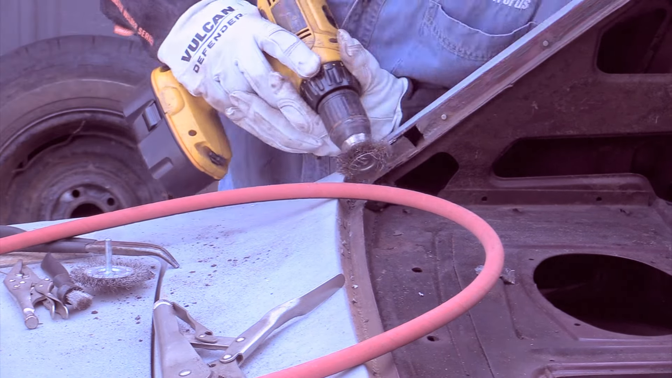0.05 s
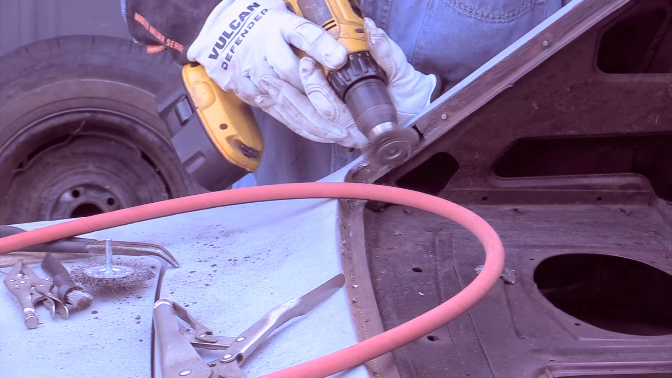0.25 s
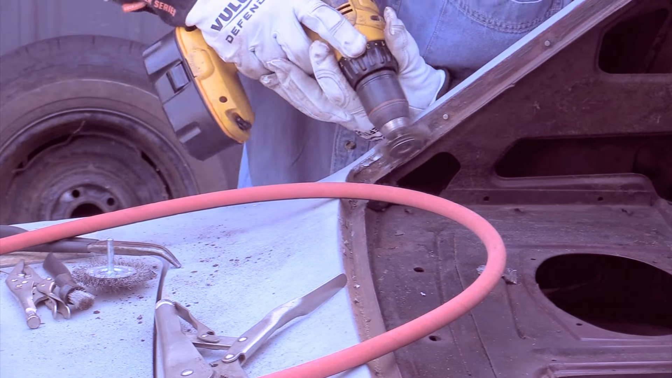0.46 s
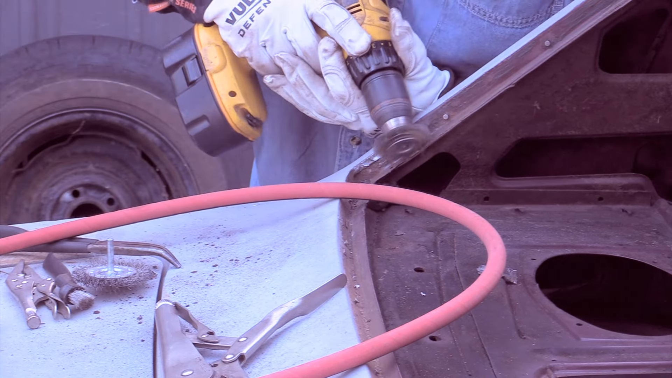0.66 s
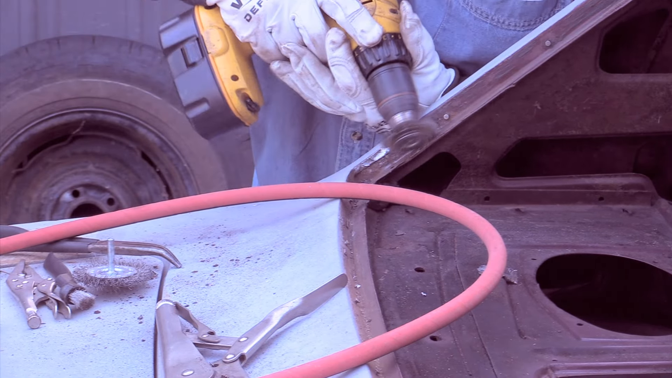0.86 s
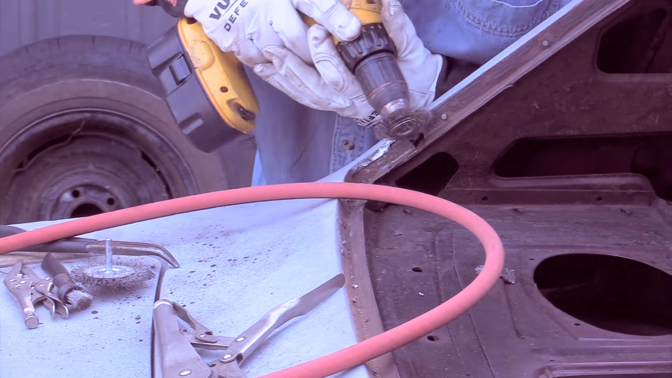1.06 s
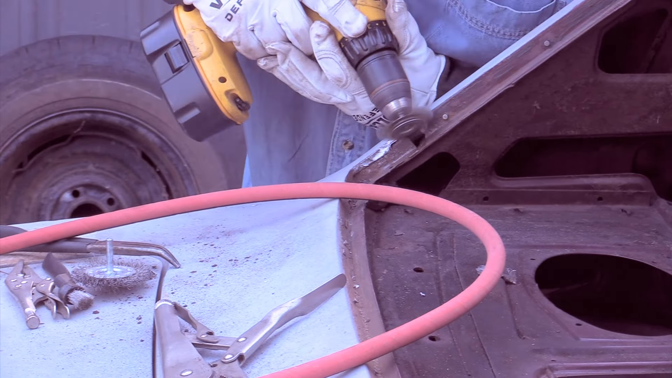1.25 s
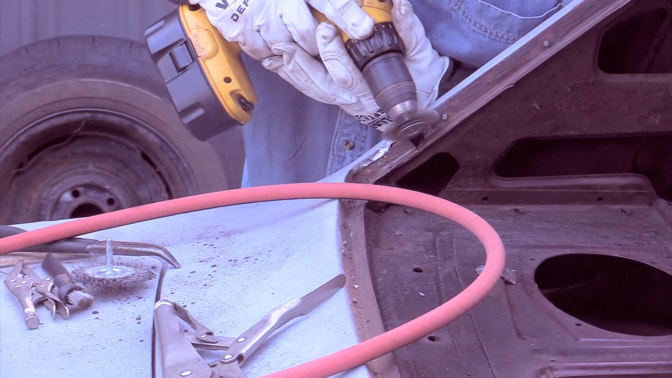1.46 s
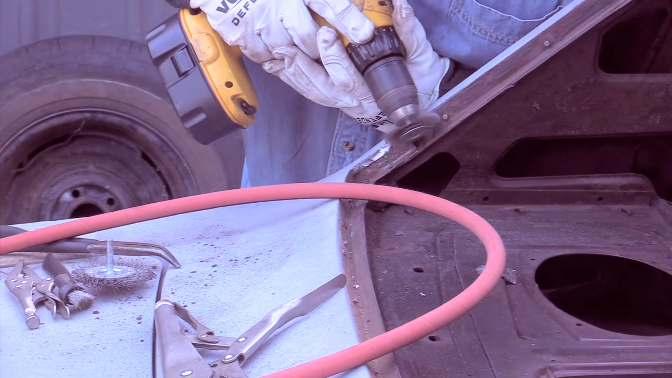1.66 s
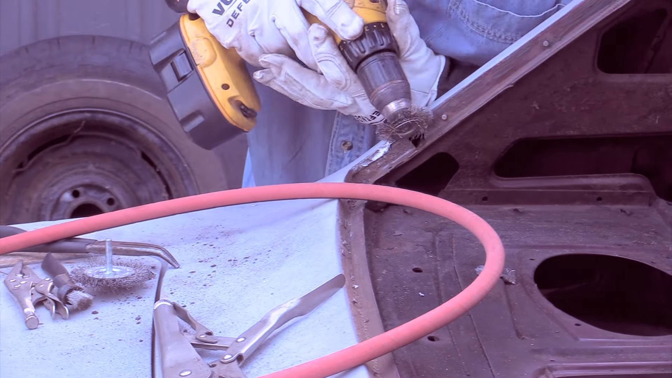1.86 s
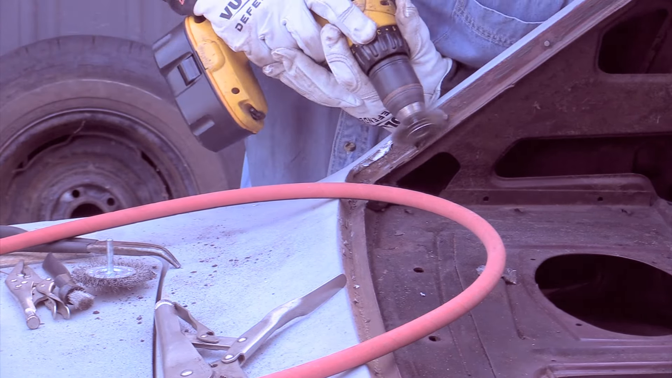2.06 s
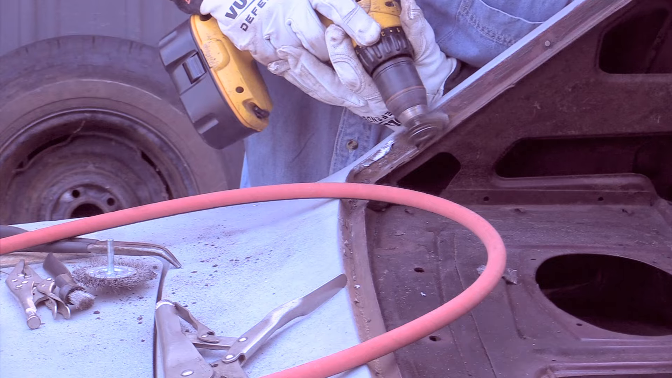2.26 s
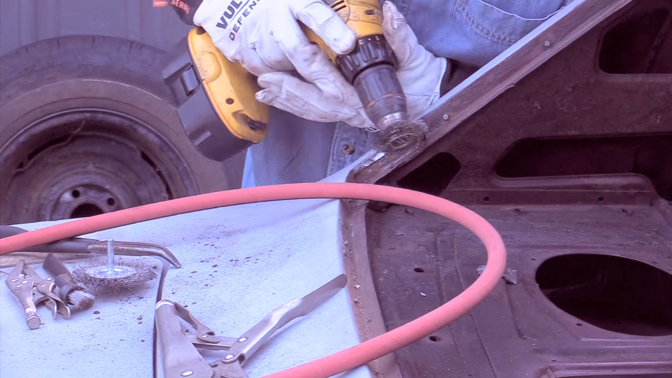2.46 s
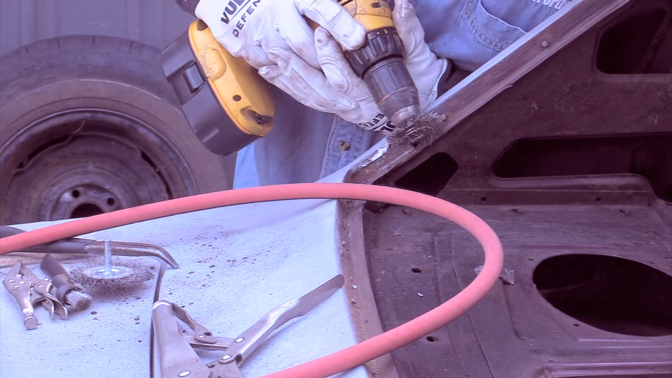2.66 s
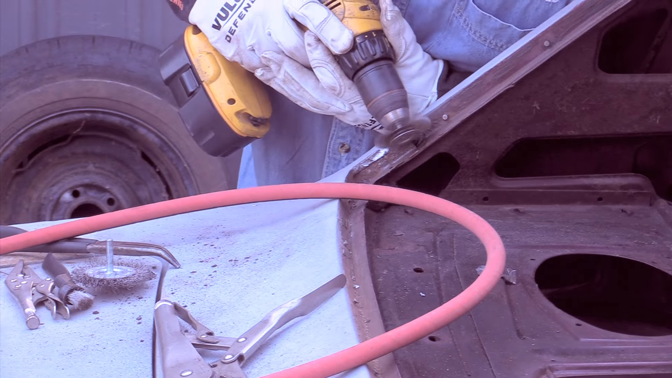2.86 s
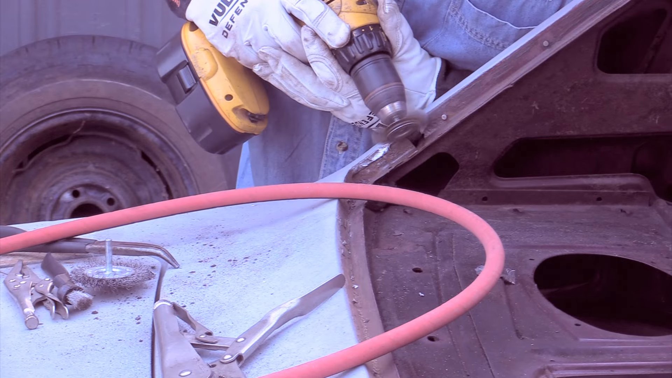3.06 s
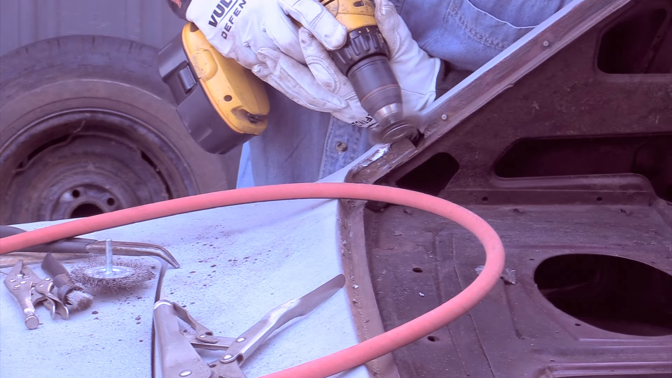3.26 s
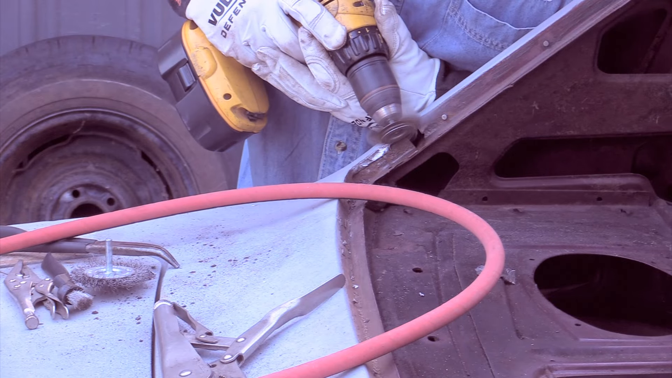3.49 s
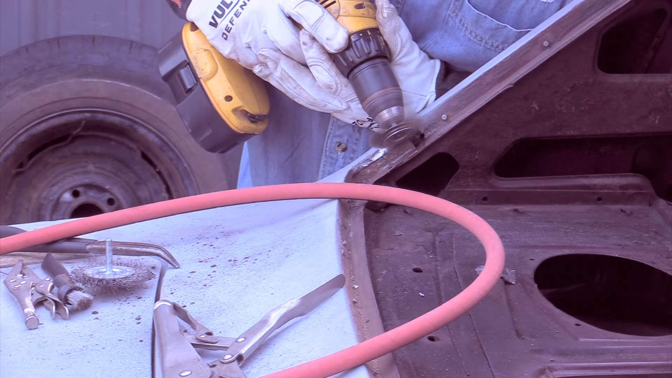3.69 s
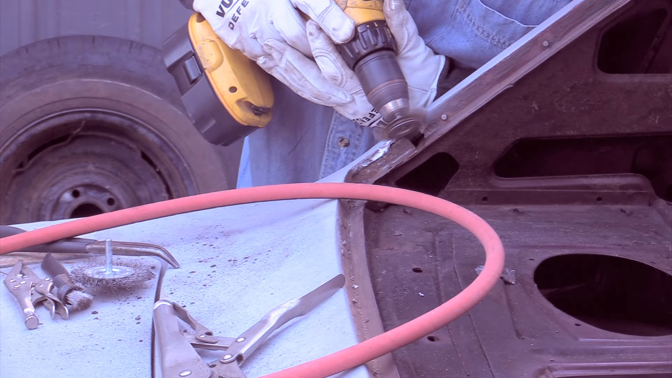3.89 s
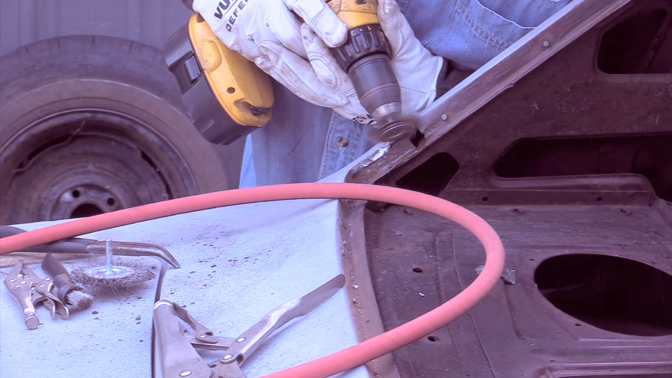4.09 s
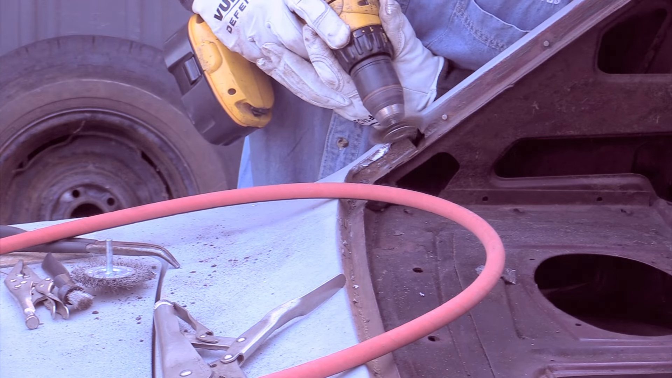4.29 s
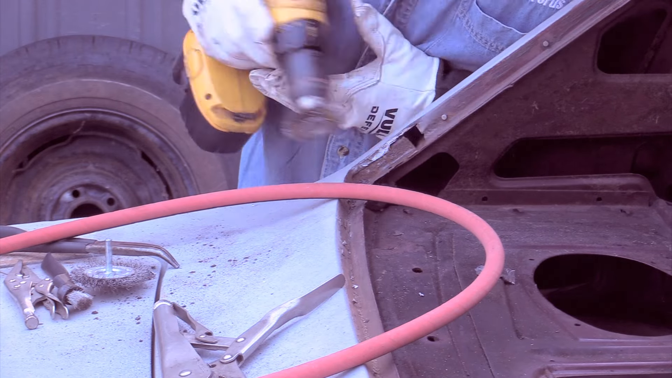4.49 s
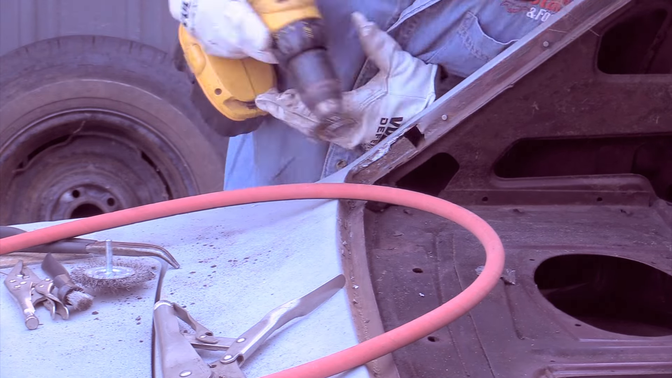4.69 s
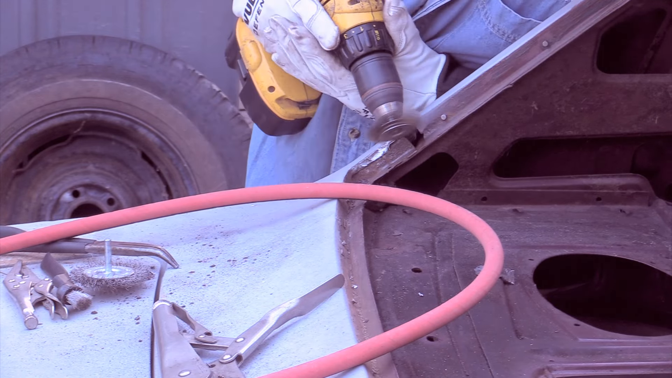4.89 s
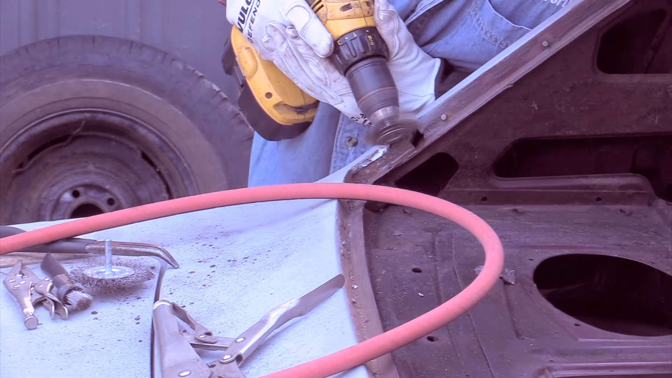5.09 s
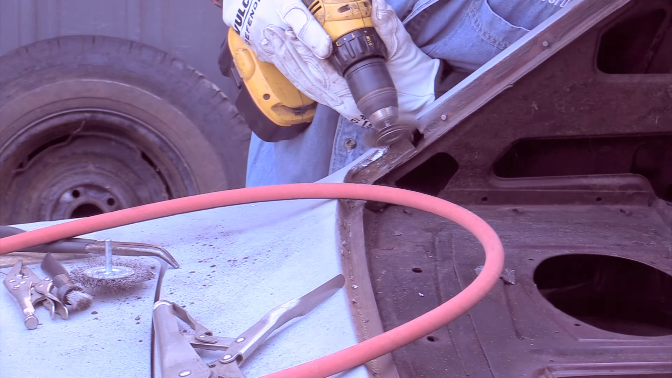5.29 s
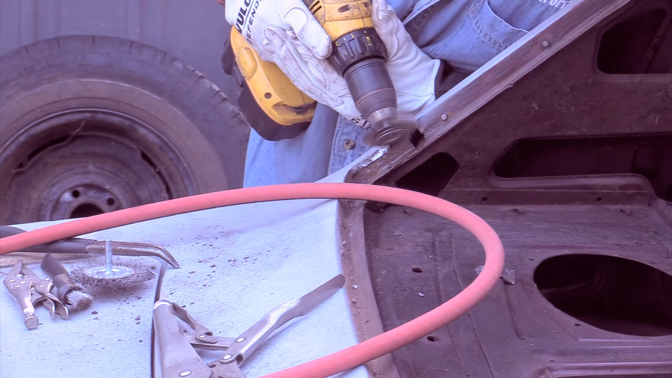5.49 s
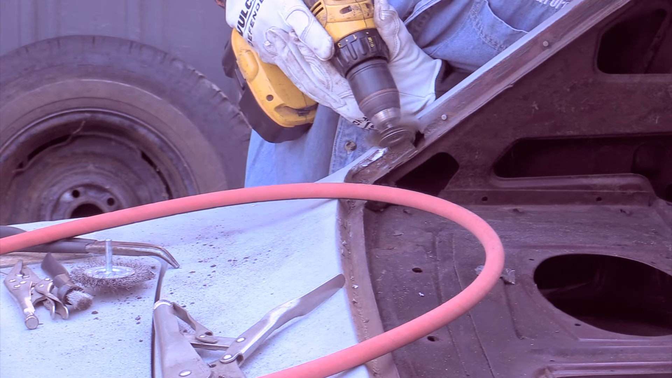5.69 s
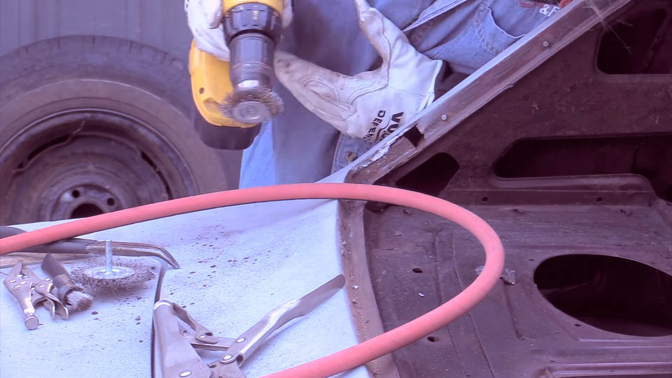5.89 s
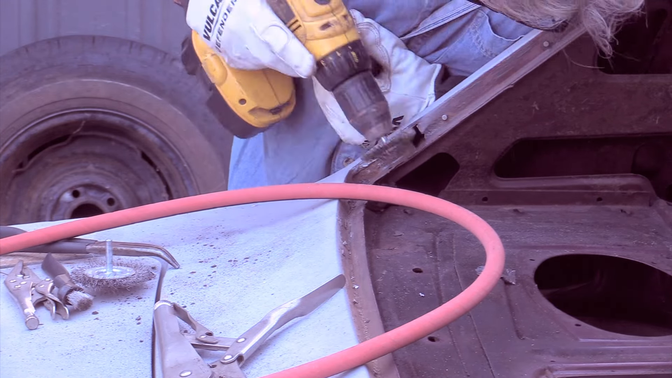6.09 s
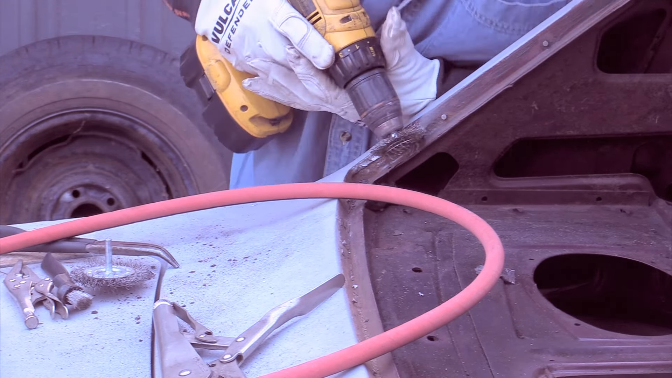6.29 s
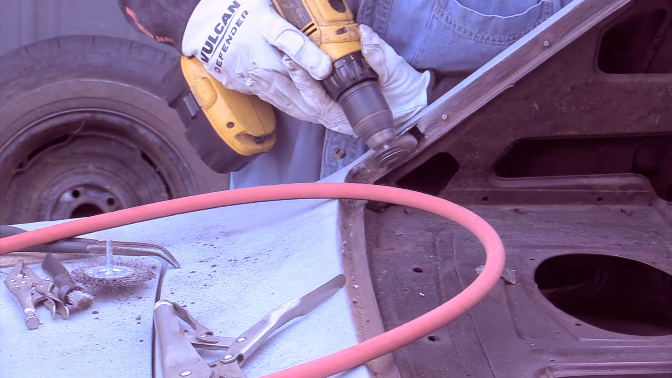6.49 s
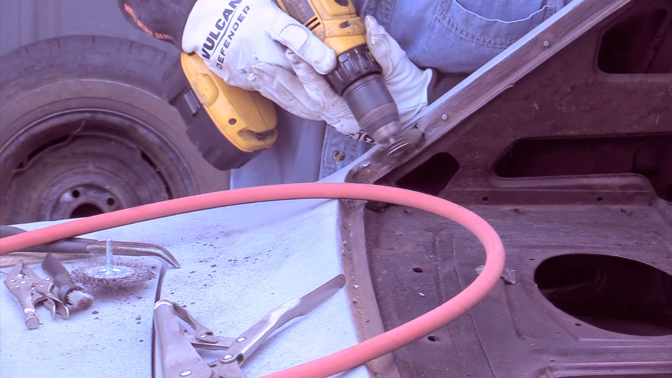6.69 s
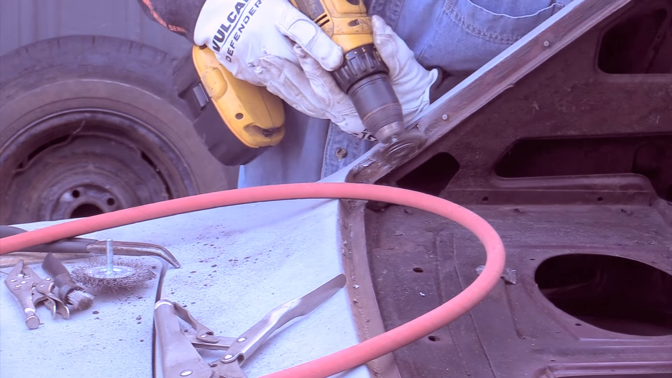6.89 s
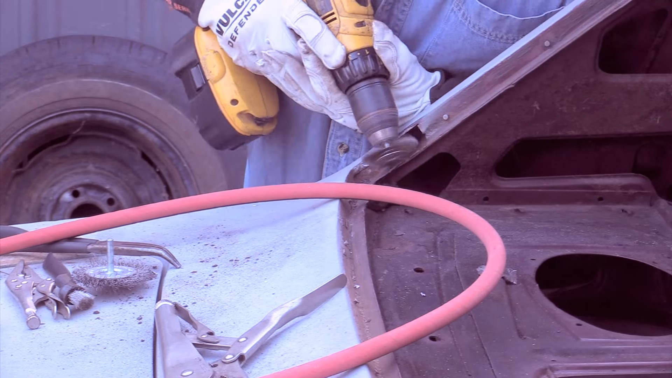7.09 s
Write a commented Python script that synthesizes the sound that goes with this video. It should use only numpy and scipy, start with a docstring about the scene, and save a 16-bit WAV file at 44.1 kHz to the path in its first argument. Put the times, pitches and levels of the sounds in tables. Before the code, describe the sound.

Seven bursts of a cordless drill with a wire brush against thin sheet steel, heard close and identically on both sides. The first is brightest, with shrill chirps and metallic ringing; later ones run slower, lower and steadier. Each whines up almost instantly, rasps under load and cuts off dead, often with a clack. Tiny gaps hold glove rustle, quiet air and a faint short room tail; one light knock precedes the last.

```python
"""In a quiet workshop, one close point of hearing feeds both channels alike: room air, a thin electrical whine.
After a faint rustle of gloves, a cordless drill spins a wire cup brush on a sheet steel edge, in seven bursts.
In most, the trigger clicks; in all seven, gears whine up as shaft-locked tones and sag under load, noise clicks
make the scratch, and blows once a turn the chatter, through the ringing panel. Some stops end in a brake clack;
a faint room tail follows. Before the last burst the brush is set down on the edge with one knock."""
import sys
import numpy as np
from scipy import signal
from scipy.fft import rfft, irfft
from scipy.io import wavfile
from scipy.ndimage import uniform_filter1d

SR = 44100
rng = np.random.default_rng(int(sys.argv[2]) if len(sys.argv) > 2 else 0)


def materialize(psi):
    """Save the field psi as 16-bit PCM at rate SR to the path in sys.argv[1].

    A 1-D psi becomes a single channel; in a 2-D psi each row is a channel.
    """
    bounded = np.clip(np.atleast_2d(psi).T, -1, 1)
    quanta = np.round(bounded * 32767).astype(np.int16)
    wavfile.write(sys.argv[1], SR, quanta)


N = 315270
TIME = np.arange(N) / SR  # s


def amp(db):
    """Decibels to gain."""
    return 10 ** (np.asarray(db) / 20)


def unit(x):
    """Scales to rms 1."""
    return x / np.sqrt(np.mean(x ** 2) + 1e-20)


def curves(rows):
    """The columns of a table, joined by straight lines in time."""
    s, *columns = np.transpose(rows)
    return [np.interp(TIME, s, column) for column in columns]


def read(points, hz):
    """A spectrum on a log-frequency axis."""
    f, value = np.transpose(points)
    return np.interp(np.log(hz + 1), np.log(f + 1), value)


def wander(hz):
    """Smooth chance of rms 1, up to about hz changes a second."""
    f = np.fft.rfftfreq(N, 1 / SR)
    spectrum = rfft(rng.standard_normal(N)) / (1 + (f / hz) ** 2)
    return unit(irfft(spectrum, N))


def swells(rows, base_db, attack_s, release_s):
    """Levels in dB, one for each dB column: every event rises, holds and dies away on top of a base level."""
    shapes = []
    for start_s, length_s, *_ in rows:
        rise = np.clip((TIME - start_s) / attack_s, 0, 1)
        fall = np.exp(-np.maximum(TIME - start_s - length_s, 0) / release_s)
        shapes.append(rise * fall)
    power = amp(np.array(rows)[:, 2:].T) ** 2 @ np.square(shapes)
    return 10 * np.log10(power + amp(base_db) ** 2)


def colour(x, spectrum, modes=(), size=8192):
    """A causal filter of unit energy: a broad spectrum with ringing resonances on top."""
    hz = abs(np.fft.fftfreq(size, 1 / SR))
    peaks = 1 + sum((amp(db) ** 2 - 1) / (1 + (2 * (hz - f) / width) ** 2) for f, width, db in modes)
    log_gain = np.log(amp(read(spectrum, hz))) + .5 * np.log(np.maximum(peaks, 1e-2))
    # the Hilbert transform gives the minimum phase that belongs to this gain
    response = np.fft.ifft(np.exp(np.conj(signal.hilbert(log_gain)))).real
    return signal.oaconvolve(x, response / np.linalg.norm(response))[:N]


def flicks(per_s, spread_db):
    """Random clicks of rms 1, as of single wires springing free; spread_db scatters their sizes."""
    size = amp(spread_db * np.minimum(rng.exponential(1, N), 5))
    return unit(size * rng.standard_normal(N) * (rng.random(N) < per_s / SR))


def blows(turns, scatter_db):
    """One click each turn of the brush, as its longest tuft strikes the edge."""
    strike = np.diff(np.floor(turns), prepend=0)
    size = amp(scatter_db * np.clip(rng.standard_normal(N), -2, 2))
    return unit(strike * size)


def blend(smooth, struck, share):
    """Mixes two drives at constant power."""
    share = np.clip(share, 0, 1)
    return np.sqrt(1 - share) * smooth + np.sqrt(share) * struck


def tone(turns, blur, blur_hz):
    """A line of rms 1 whose phase wanders by blur radians rms."""
    return np.sqrt(2) * np.sin(2 * np.pi * turns + blur * wander(blur_hz))


# steady electrical whine in the room: pitch_hz, level_db
WHINE_LINES = [(1017, -68), (1222, -84.5), (2035, -79), (3050, -83.5)]
# colour of the room air: pitch_hz, relative density_db
AIR_SPECTRUM = [(15, -66), (25, -35.5), (161, -12), (936, -17), (1020, -14.5), (1100, -14), (1260, -7),
                (1400, -23), (2000, -15.5), (2480, -19.5), (3160, -21.5), (9840, -39.5), (16000, -68)]


def background(air_db):
    """Filtered noise as room air that drifts in level, and a thin whine whose overtones come and go."""
    lines = [amp(db) * tone(hz * TIME, blur=.3, blur_hz=16) for hz, db in WHINE_LINES]
    overtones = sum(line * amp(2.6 * wander(7.6)) for line in lines[1:])
    whine = lines[0] * amp(1.0 * wander(6)) + overtones
    air = colour(rng.standard_normal(N), AIR_SPECTRUM)
    return whine + amp(air_db + 2.4 * wander(4.3)) * air


# reverberation of the workshop: pitch_hz, t60_s
ROOM_DECAY = [(150, .3), (1500, 0.41), (6000, 0.32), (15000, 0.16)]


def workshop(x, size=SR // 2):
    """A diffuse tail of decaying noise, each band dying at its own speed."""
    hz, t, z = signal.stft(rng.standard_normal(size), SR, nperseg=256)
    decay = amp(-60 * t / read(ROOM_DECAY, hz)[:, None])
    tail = signal.istft(z * decay, SR, nperseg=256)[1]
    return signal.oaconvolve(x, tail / np.linalg.norm(tail))[:N]


# gloves and wires rustle as the drill is lifted or set down: start_s, length_s, level_db
RUSTLE_EVENTS = [(.215, 0.064, -70), (4.48, 0.082, -72), (4.71, 0.12, -78), (5.86, 0.065, -76),
                 (6.24, 0.139, -67)]
FAINT_RUSTLE_DB = -84
# colour of the gloves: pitch_hz, relative density_db
GLOVE_SPECTRUM = [(300, -6), (5000, 5), (15000, -12)]


def handling():
    """A faint rustle of separate little scrapes: sparse clicks in uneven flurries, coloured by the gloves."""
    rustle_db = swells(RUSTLE_EVENTS, FAINT_RUSTLE_DB, attack_s=.04, release_s=0.0346)[0]
    scrapes = unit(flicks(per_s=1900, spread_db=0.5) * amp(3.2 * wander(35)))
    return amp(rustle_db) * colour(scrapes, GLOVE_SPECTRUM)


# the brush is set down on the edge: start_s, ring_db, thump_db
SET_DOWN_KNOCK = (6.271, -58, -53)
# broad ring and low rumble of the sheet, played again by panel(): pitch_hz, relative density_db
RING_SPECTRUM = [(300, -21), (700, -8), (1000, -4.5), (1150, -4), (1800, -1), (2600, 1), (3300, 2),
                 (4300, -9), (9000, -27)]
RUMBLE_SPECTRUM = [(20, -30), (50, -15), (80, -7), (115, -1.5), (200, -0.5), (350, 1), (600, 0), (850, -2),
                   (1200, -4.5), (2500, -50)]
# resonances of the sheet: pitch_hz, width_hz, boost_db above the broad spectrum
RING_MODES = [(825, 25, 6), (1164, 40, 11.5), (1281, 16, 7), (1393, 20, 6), (1608, 16, 11), (1722, 20, 8),
              (1896, 20, 10), (2064, 28, 8), (2423, 45, 7), (2730, 70, 4), (2884, 32, 6), (3740, 22, 9)]


def set_down(decay_s):
    """The resting brush knocks once on the panel: a short noise burst drives its ring and rumble."""
    start_s, ring_db, thump_db = SET_DOWN_KNOCK
    knock = (TIME >= start_s) * np.exp(-abs(TIME - start_s) / decay_s) * rng.standard_normal(N)
    ring = amp(ring_db) * colour(knock, RING_SPECTRUM, RING_MODES)
    return ring + amp(thump_db) * colour(knock, RUMBLE_SPECTRUM)


# clicks of trigger, brake and chuck: start_s, level_db
CLICK_EVENTS = [(.164, -52), (.276, -44), (1.119, -42), (1.128, -35), (1.897, -24), (1.968, -34),
                (2.502, -28), (3.92, -37), (4.465, -32), (4.741, -60), (5.877, -27.5), (6.217, -60),
                (6.271, -43), (6.308, -60), (6.375, -59), (6.387, -34), (6.868, -30)]
# colour of the drill's housing: pitch_hz, relative density_db
CLICK_SPECTRUM = [(20, -4), (70, 10), (300, -29), (1200, 3), (3500, 14), (5500, 13.5), (8000, 1),
                  (16000, -28)]


def clicks(decay_s):
    """Short dry clacks of the drill's housing, as decaying noise."""
    level = sum(amp(db) * (TIME >= s) * np.exp(-abs(TIME - s) / decay_s) for s, db in CLICK_EVENTS)
    return colour(level * rng.standard_normal(N), CLICK_SPECTRUM)


# each pull of the trigger, levels before speed, contact and fixed layer trims:
# on_s, off_s, bite_s (wires take hold), press_s (brush pressed in), scratch_db, ring_db of the panel,
# rumble_db, hum_db of the armature, whine_db of the gears, squeal_db of the gears
TRIGGER_PULLS = [(0.276, 1.074, 0.027, 0.037, -35, -43, -51.5, -65, -43, -61.5),
                 (1.123, 1.896, 0.017, 0.021, -35.5, -46, -49.5, -57, -44.5, -58),
                 (1.955, 2.505, 0.013, 0.018, -35, -50.5, -52.5, -57.5, -45, -59),
                 (2.738, 3.877, 0.017, .03, -36.5, -50, -52, -58.5, -48.5, -56),
                 (3.918, 4.467, .02, 0.083, -37.5, -51.5, -53, -58, -50, -53),
                 (4.83, 5.879, 0.011, 0.17, -39, -47, -52.5, -55, -48, -56),
                 (6.385, 7.203, 0.046, 0.025, -38, -53.5, -58, -62, -48.5, -54.5)]


def burst_settings():
    """The columns of the trigger pulls as signals: each row holds until the next pull."""
    rows = np.array(TRIGGER_PULLS)
    return rows[np.searchsorted(rows[1:, 0], TIME, side="right")].T


def trigger(brake_s):
    """Gain 1 while the trigger is held; on release the brake cuts the sound within milliseconds."""
    return sum((TIME >= on) * np.exp(-np.maximum(TIME - off, 0) / brake_s)
               for on, off, *_ in TRIGGER_PULLS)


SPIN_UP_S, SPIN_UP_CURVE = .03, 1.5


def spin_up(age):
    """Share of full speed: the motor winds up after each pull of the trigger."""
    return 1 - np.exp(-(age / SPIN_UP_S) ** SPIN_UP_CURVE)


# motor speed under load, one curve for each burst: time_s, speed in shaft turns a second
LOADED_SPEEDS = [
    [(0.315, 378), (0.365, 361), (0.465, 349), (0.555, 320), (0.625, 332), (0.75, 339), (0.835, 320),
     (1.015, 274), (1.085, 296)],
    [(1.165, 345), (1.225, 291), (1.34, 286), (1.38, 308), (1.48, 277), (1.59, 278), (1.64, 224),
     (1.74, 276), (1.805, 240), (1.865, 276)],
    [(1.995, 262), (2.09, 247), (2.135, 298), (2.175, 302), (2.285, 283), (2.41, 261), (2.515, 274)],
    [(2.825, 290), (2.91, 290), (2.955, 271), (3.235, 266), (3.67, 246), (3.76, 252), (3.855, 227)],
    [(3.98, 251), (4.06, 271), (4.145, 253), (4.265, 241), (4.365, 220), (4.445, 218)],
    [(4.885, 284), (4.965, 299), (5.045, 298), (5.34, 263), (5.465, 266), (5.58, 253), (5.875, 242)],
    [(6.465, 269), (6.525, 237), (6.6, 218), (6.735, 219), (6.85, 207), (6.93, 228), (6.995, 210),
     (7.085, 217), (7.135, 203)],
]
SURGE_S = .3  # length of the surrounding moment


def loaded_speed():
    """Turns a second under load; the same in octaves above its burst's mean, and above the moment around it."""
    speed, octaves, surge = np.zeros((3, N))
    for (on, off, *_), points in zip(TRIGGER_PULLS, LOADED_SPEEDS):
        curve = curves(points)[0]
        since = TIME >= on
        burst_mean = curve[since & (TIME < off)].mean()
        nearby_mean = uniform_filter1d(curve, round(SURGE_S * SR))
        speed[since] = curve[since]
        octaves[since] = np.log2(curve / burst_mean)[since]
        surge[since] = np.log2(curve / nearby_mean)[since]
    return speed, octaves, surge


# armature and gear tones: order (multiple of shaft speed), level_db relative to hum or whine
HUM_TONES = [(3, 0), (6, -2), (9, -10), (12, -7)]
GEAR_TONES = [(15, 0), (18, -14), (21, -12)]
GEARING = .195  # brush turns per shaft turn
SQUEAL_ORDER = 37.7  # multiple of shaft speed
SIDEBAND_DB = -11  # the squeal throbs once a shaft turn: a weaker line just under it
# the gearbox passes the squeal best near its resonances, read in scene(): pitch_hz, gain_db
GEARBOX_GAIN = [(7600, 9), (8300, 7), (9000, 1), (10400, 0.5), (11200, 4.5), (11800, 3.5), (13500, 16)]


def motor(shaft, hum_db, whine_db, squeal_db):
    """Armature hum, gear mesh and a thin squeal follow the shaft; order nine sings near a housing resonance."""
    hum = sum(amp(db) * tone(round(k) * shaft, blur=.35, blur_hz=40) for k, db in HUM_TONES)
    mesh = sum(amp(db) * tone(round(k) * shaft, blur=.6, blur_hz=50) for k, db in GEAR_TONES)

    ninth_hz = 9 * np.gradient(shaft) * SR
    housing = 1 / np.hypot(1, (ninth_hz - 2700) / 130)  # resonance at 2700 Hz, half-width 130 Hz
    mesh = mesh + amp(-10.5) * housing * tone(9 * shaft, blur=.6, blur_hz=50)

    squeal = tone(SQUEAL_ORDER * shaft, blur=1.1, blur_hz=55)
    squeal = squeal + amp(SIDEBAND_DB) * tone((SQUEAL_ORDER - 1) * shaft, blur=1.1, blur_hz=55)

    # the teeth are loaded unevenly, partly once a brush turn
    load = unit(amp(2 * wander(45) + 0.43 * np.sin(2 * np.pi * GEARING * shaft)))
    gears = amp(whine_db - 0.5) * mesh + amp(squeal_db + 3.0) * squeal
    return amp(hum_db) * hum + load * gears


# the wire tips chirp shrilly on the edge: start_s, length_s, level_db
CHIRP_EVENTS = [(.48, 0.085, -39), (.56, .2, -41), (.76, .29, -39), (1.16, 0.657, -46.5), (2.13, .2, -49)]
FAINT_CHIRP_DB = -55.5


def chirp(shaft, turns):
    """A fuzzy whistle, narrow noise at 19.5 times the shaft speed, that flares once a brush turn."""
    flare = unit(np.exp(1.1 * np.cos(2 * np.pi * (turns - .3))))
    angle = 2 * np.pi * 19.5 * shaft
    fuzz = unit(wander(210) * np.cos(angle) + wander(210) * np.sin(angle))
    chirp_db = swells(CHIRP_EVENTS, FAINT_CHIRP_DB, attack_s=.025, release_s=.03)[0]
    return amp(chirp_db) * flare * fuzz


# the brush bounces once a turn and the panel drones: start_s, length_s, level_db
DRONE_EVENTS = [(1.57, 0.11, -49.5), (2.22, 0.21, -51)]
FAINT_DRONE_DB = -74
# colour of the drone: pitch_hz, relative density_db
DRONE_SPECTRUM = [(50, -41), (140, -7.5), (210, 2.5), (370, -5), (480, -4.5), (900, -35.5)]
# resonances of the drone: pitch_hz, width_hz, boost_db above the broad spectrum
DRONE_MODES = [(214, 26, 5.3), (362, 16, 12)]


def panel(turns, ring_db, rumble_db):
    """Clicks make the sheet ring and rumble; the louder the ring, the more they bunch into chatter each turn."""
    stroke = .3 + np.exp(-(turns % 1) / .15)
    tuft = unit(stroke * flicks(per_s=5000, spread_db=0.3))  # wires follow the first blow over the edge
    chatter = blend(tuft, blows(turns, scatter_db=1.1), share=.17)
    chatter_share = np.clip(0.049 * (ring_db + 42.5), .1, .85)
    ring = blend(flicks(per_s=7000, spread_db=1.4), chatter, chatter_share)
    rumble = blend(flicks(per_s=3000, spread_db=-0.5), blows(turns, scatter_db=2.5), share=0.064)

    drone_db = swells(DRONE_EVENTS, FAINT_DRONE_DB, attack_s=0.086, release_s=0.029)[0]
    rumble_power = amp(rumble_db) ** 2
    # bouncing takes the place of rubbing, down to half its power
    rubbing = np.sqrt(np.maximum(rumble_power - amp(drone_db) ** 2, .5 * rumble_power))
    drone = colour(blows(turns, scatter_db=1.5), DRONE_SPECTRUM, DRONE_MODES)
    return (amp(ring_db - 0.56) * colour(ring, RING_SPECTRUM, RING_MODES)
            + amp(0.35) * rubbing * colour(rumble, RUMBLE_SPECTRUM)
            + amp(drone_db) * drone)


# colour of the scratching wires: pitch_hz, relative density_db
SCRATCH_SPECTRUM = [(400, -22.5), (850, -15.5), (1500, -9.5), (2600, -5), (3600, -2.5), (5000, 0.5),
                    (6200, 0.5), (7200, -4), (8500, -6), (10200, -8), (12000, -11.5), (13500, -10.5),
                    (15000, -7), (15800, -4.5)]


def wires(turns, spin, scratch_db):
    """Thousands of wire tips scrape the steel, harder on one side of the cup; a slow brush is duller."""
    once, twice = np.cos(2 * np.pi * turns), np.cos(4 * np.pi * turns)
    swell = amp(0.56 * once + 0.53 * twice + 0.21 * wander(120))
    bright = colour(flicks(per_s=22000, spread_db=1.3) * unit(swell), SCRATCH_SPECTRUM)
    dull = signal.lfilter(*signal.butter(1, 5000, fs=SR), bright)
    slow = .7 * (1 - spin)
    return amp(scratch_db + 1.1) * ((1 - slow) * bright + slow * dull)


# the wires catch on the edge, levels before fixed layer trims:
# start_s, length_s, scratch_db, ring_db, rumble_db
CATCH_EVENTS = [(.355, 0.072, -47, -32, -57), (.48, 0.12, -40, -29.5, -52),
                (.58, 0.11, -33.5, -40.5, -49.5), (.735, 0.018, -41, -33, -60), (.78, 0.21, -40, -31, -59),
                (1.595, 0.053, -36, -46, -49), (2.02, 0.053, -43, -41.5, -49.5),
                (2.79, 0.34, -43.5, -47, -52), (5.7, 0.12, -54, -55, -54.5),
                (6.36, 0.04, -43.5, -50.5, -83), (6.97, 0.017, -53, -41, -52)]
CATCH_ATTACK_S, CATCH_RELEASE_S = 0.017, .028
# the hand lifts the brush just before it lets go of the trigger
LIFT_S, LIFT_SCRATCH_DB, LIFT_PANEL_DB = 0.015, -4, -7
# dB per octave above the burst's mean speed: a faster motor hums and whines louder, the scratch softens
SCRATCH_DB_PER_OCTAVE, HUM_DB_PER_OCTAVE, WHINE_DB_PER_OCTAVE = -1.5, 14, 25
# the whine flares when the motor frees itself: dB per octave above the surrounding moment
SURGE_DB_PER_OCTAVE = 18
# pressing harder slows the motor and drives the panel: dB per octave of sag
RING_DB_PER_SAG, RUMBLE_DB_PER_SAG = 4.5, 6
# at the first instant of a burst: the scratch, the slack gears, the panel before the brush is pressed in
STANDING_DB, SLACK_DB, UNPRESSED_DB = -9, -19, -17.5


def scene():
    """Each burst winds the motor up, presses the brush in and lifts it; speed and contact set the levels."""
    (on, off, bite_s, press_s, scratch_db, ring_db, rumble_db,
     hum_db, whine_db, squeal_db) = burst_settings()
    age = np.maximum(TIME - on, 0)
    spin = spin_up(age)
    slack = np.exp(-age / bite_s)
    lift = np.exp(np.minimum(TIME - off, 0) / LIFT_S)
    speed, octaves, surge = loaded_speed()
    shaft = np.cumsum(spin * speed * (1 + .002 * wander(20))) / SR
    turns = GEARING * shaft

    pressure_db = UNPRESSED_DB * np.exp(-age / press_s) + LIFT_PANEL_DB * lift
    contact_db = STANDING_DB * slack + LIFT_SCRATCH_DB * lift
    gliding_db = [scratch_db + contact_db + SCRATCH_DB_PER_OCTAVE * octaves,
                  ring_db + pressure_db - RING_DB_PER_SAG * octaves,
                  rumble_db + pressure_db - RUMBLE_DB_PER_SAG * octaves]
    scratch_db, ring_db, rumble_db = swells(CATCH_EVENTS, gliding_db, CATCH_ATTACK_S, CATCH_RELEASE_S)
    brush = wires(turns, spin, scratch_db) + panel(turns, ring_db, rumble_db)

    # the gears sing only while they carry load; the lift slackens the squeal alone
    hum_db = hum_db + HUM_DB_PER_OCTAVE * octaves
    whine_db = whine_db + SLACK_DB * slack + WHINE_DB_PER_OCTAVE * octaves + SURGE_DB_PER_OCTAVE * surge
    squeal_db = squeal_db + SLACK_DB * (slack + lift) + read(GEARBOX_GAIN, SQUEAL_ORDER * speed)
    gears = motor(shaft, hum_db, whine_db, squeal_db)
    tones = spin ** 2 * (gears + chirp(shaft, turns))

    drill = trigger(brake_s=0.0028) * (brush + tones) + clicks(decay_s=0.0018)
    room = amp(-32.5) * workshop(drill)
    mix = drill + room + handling() + set_down(decay_s=0.005) + background(air_db=-69.5)
    return np.array([mix, mix])


EDGE_HZ = 15900  # upper band edge


def record(dry):
    """The recorder's band limit: a steep low-pass filter on both channels."""
    lowpass = signal.firwin(511, EDGE_HZ, window=("kaiser", 9), fs=SR)
    return signal.oaconvolve(dry, lowpass[None], "same")


dry = scene()
out = record(dry)
materialize(out)
```